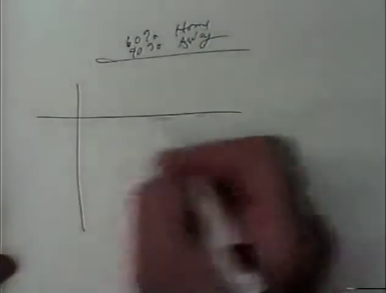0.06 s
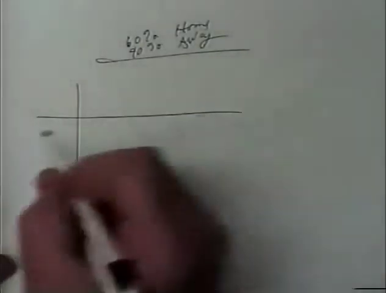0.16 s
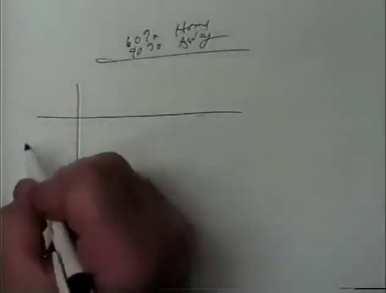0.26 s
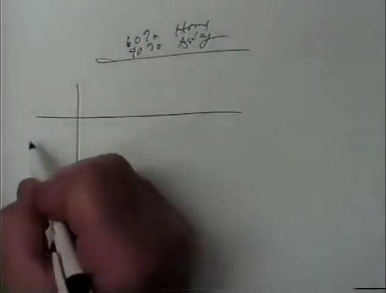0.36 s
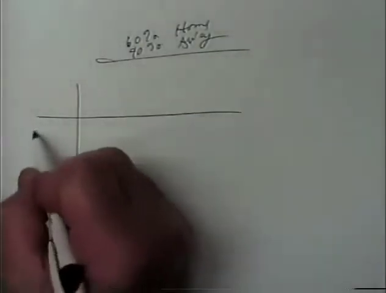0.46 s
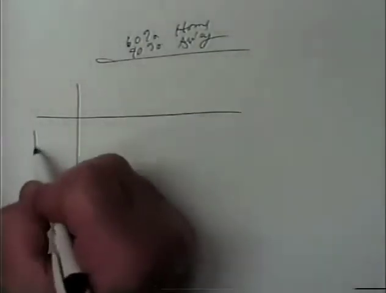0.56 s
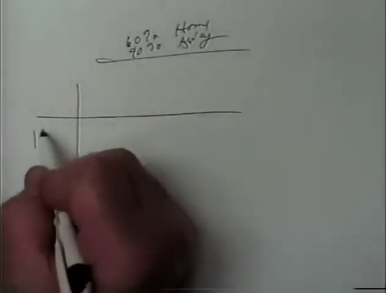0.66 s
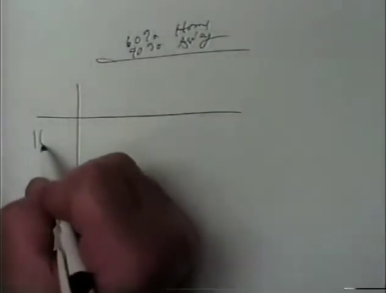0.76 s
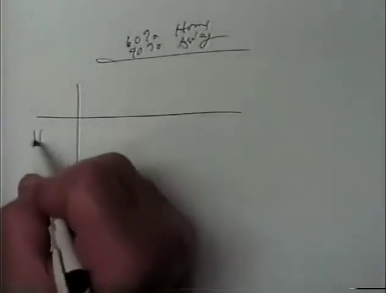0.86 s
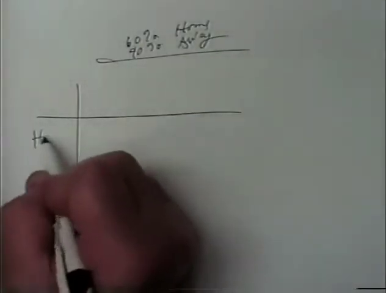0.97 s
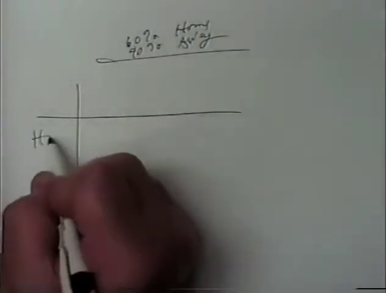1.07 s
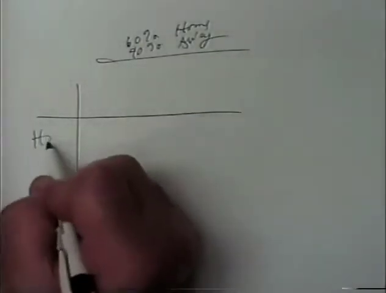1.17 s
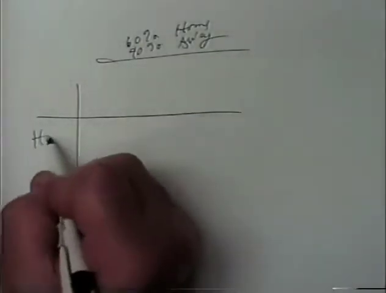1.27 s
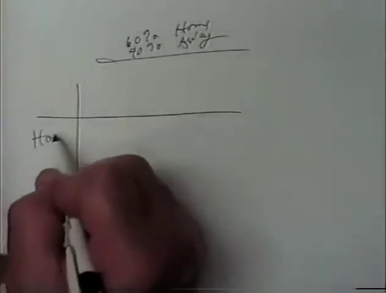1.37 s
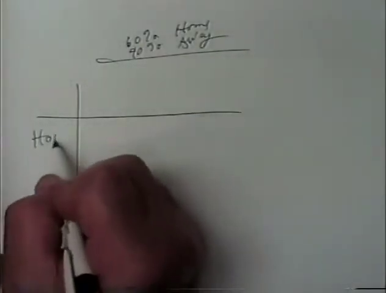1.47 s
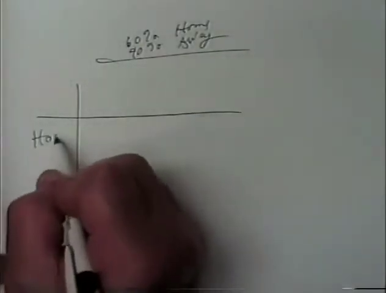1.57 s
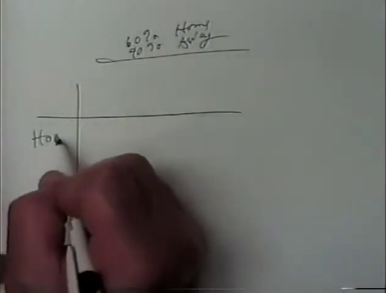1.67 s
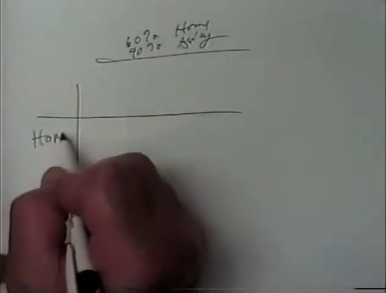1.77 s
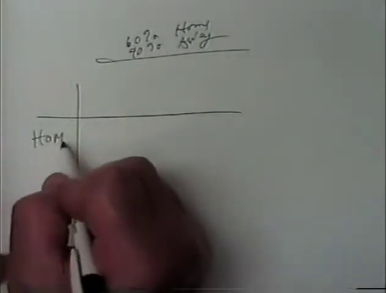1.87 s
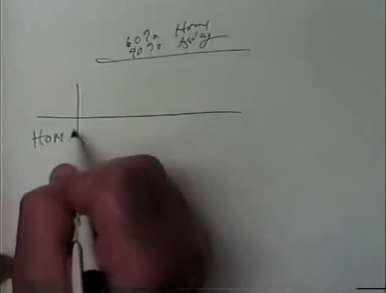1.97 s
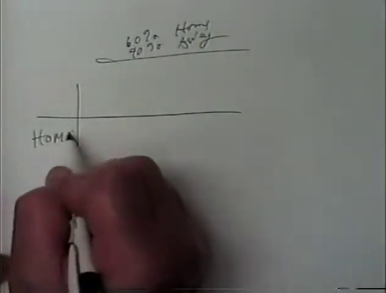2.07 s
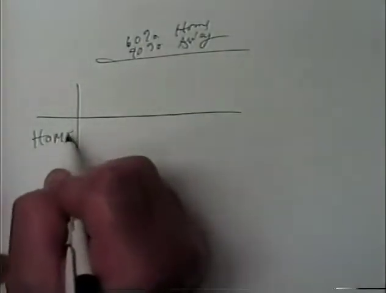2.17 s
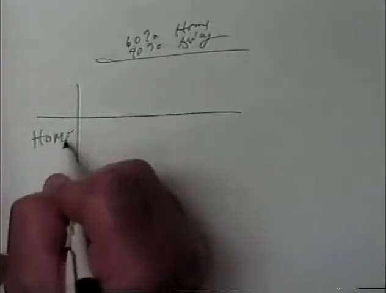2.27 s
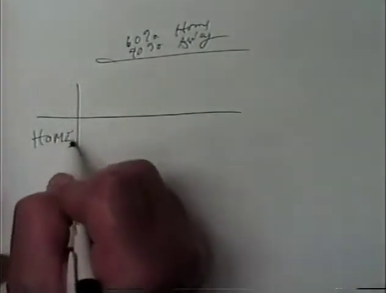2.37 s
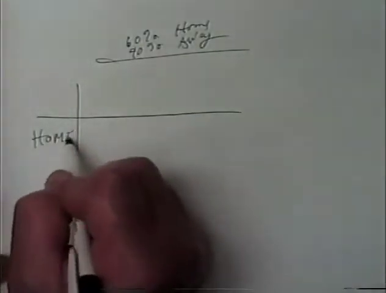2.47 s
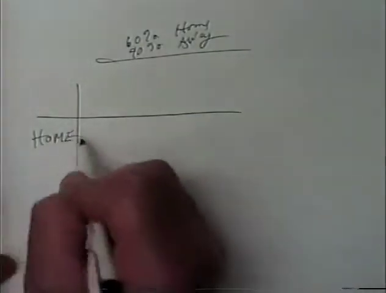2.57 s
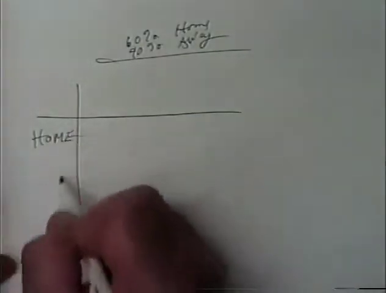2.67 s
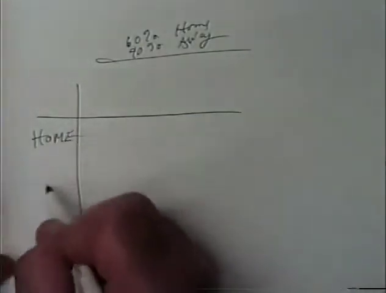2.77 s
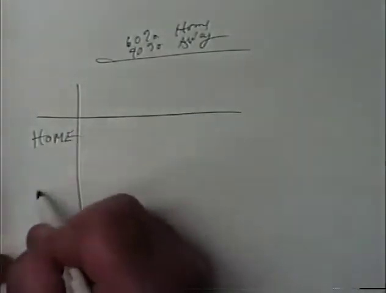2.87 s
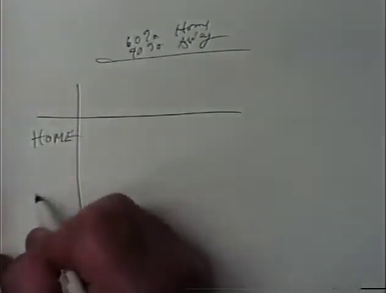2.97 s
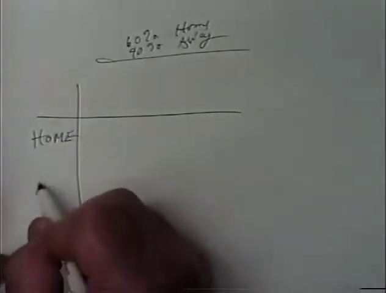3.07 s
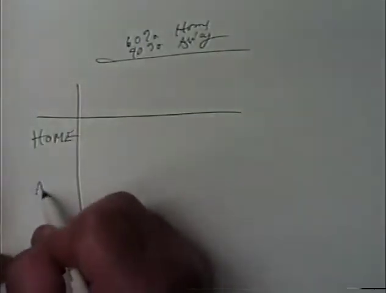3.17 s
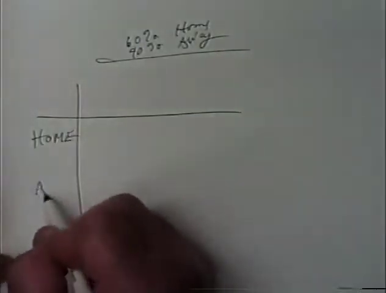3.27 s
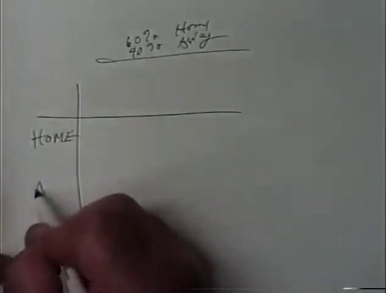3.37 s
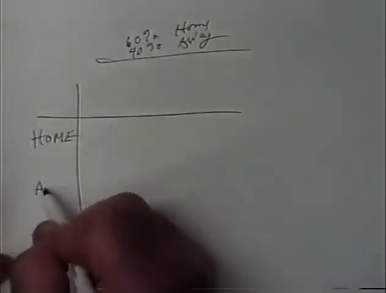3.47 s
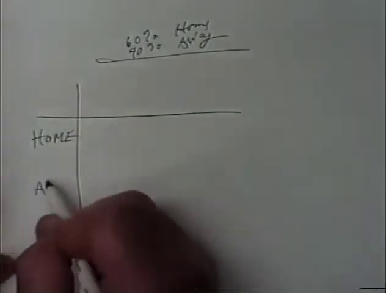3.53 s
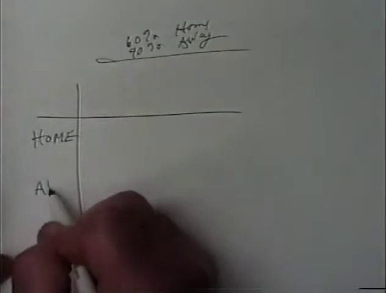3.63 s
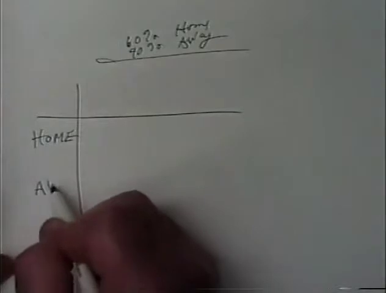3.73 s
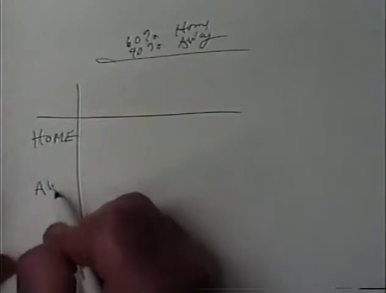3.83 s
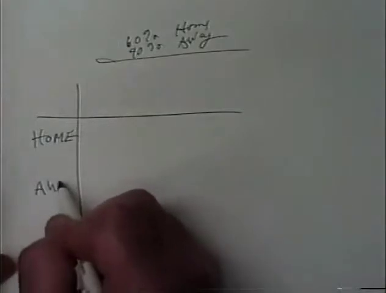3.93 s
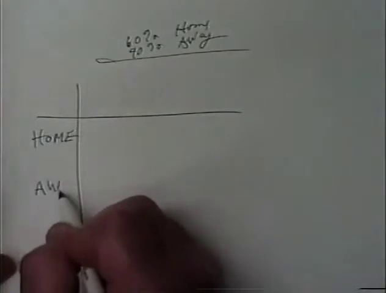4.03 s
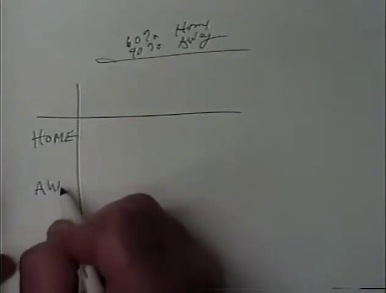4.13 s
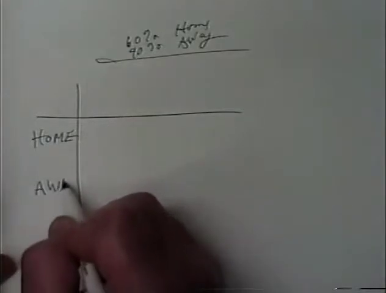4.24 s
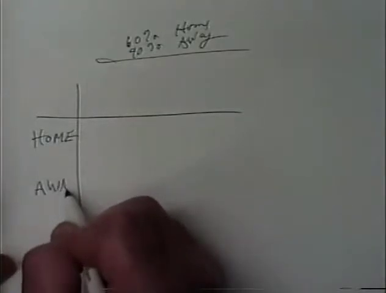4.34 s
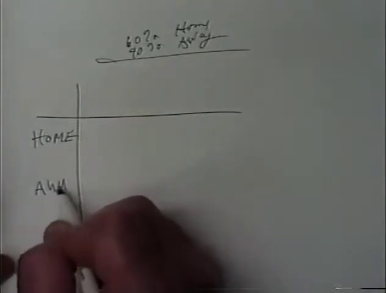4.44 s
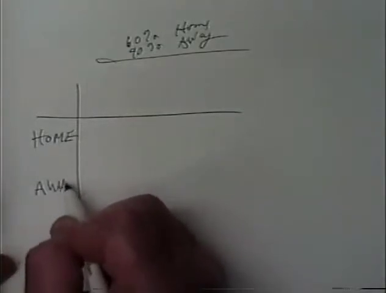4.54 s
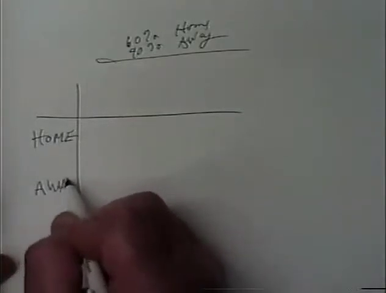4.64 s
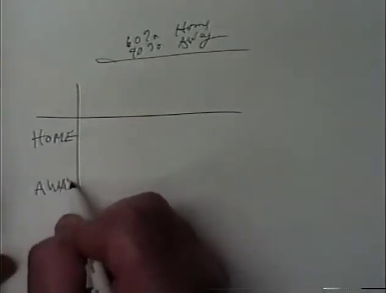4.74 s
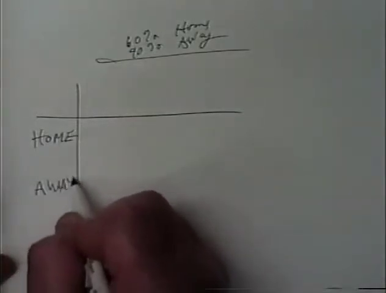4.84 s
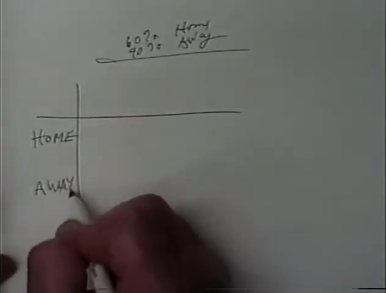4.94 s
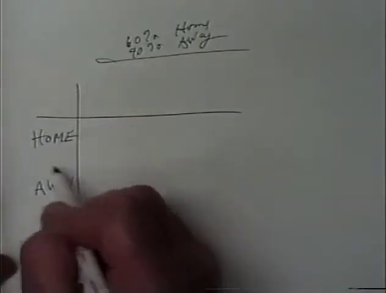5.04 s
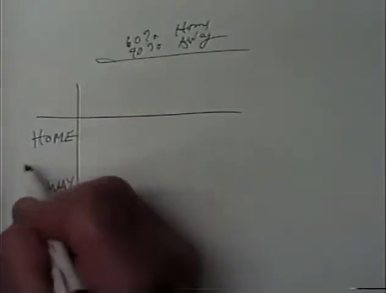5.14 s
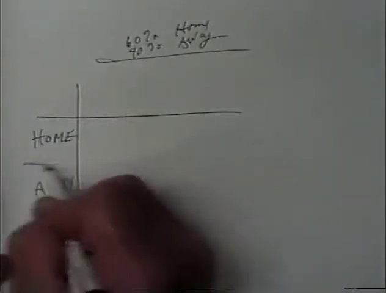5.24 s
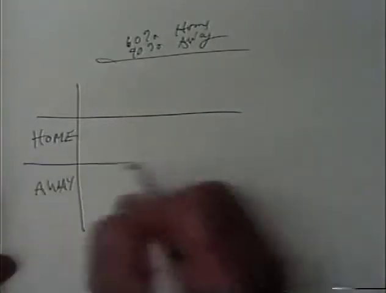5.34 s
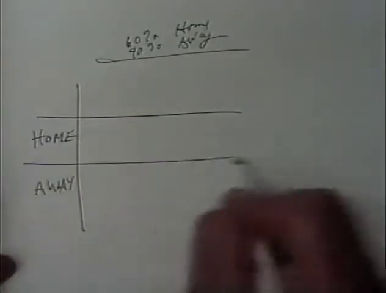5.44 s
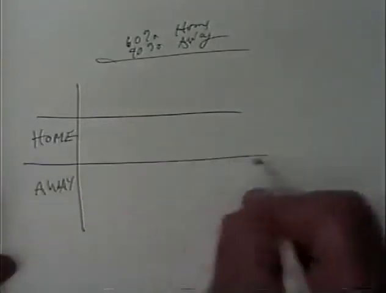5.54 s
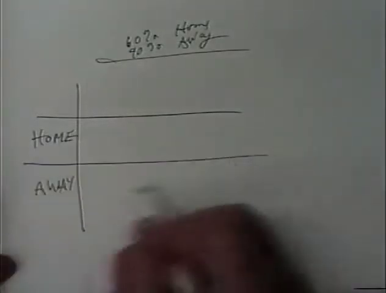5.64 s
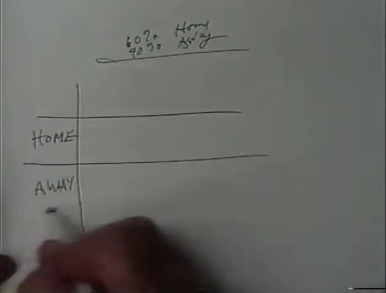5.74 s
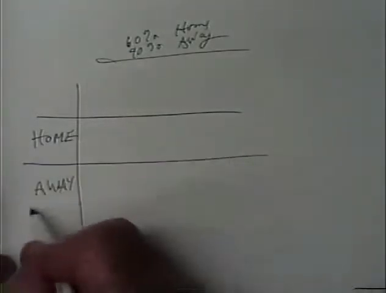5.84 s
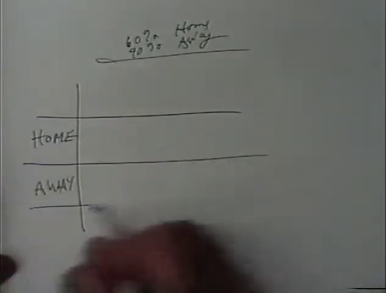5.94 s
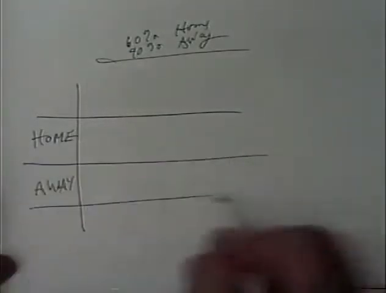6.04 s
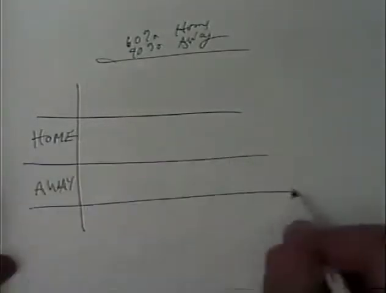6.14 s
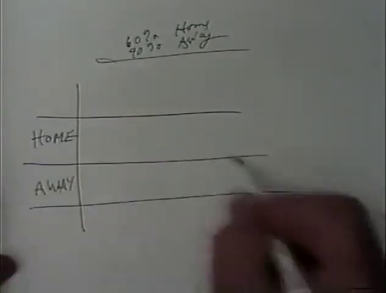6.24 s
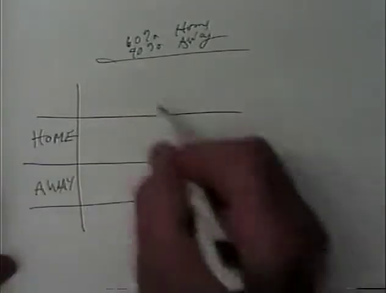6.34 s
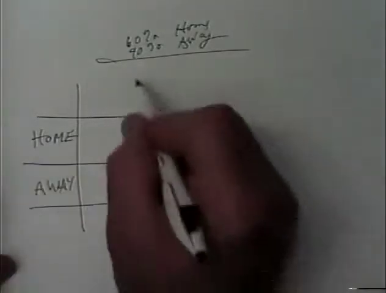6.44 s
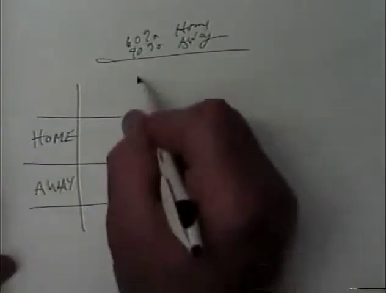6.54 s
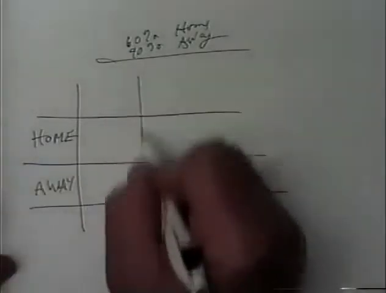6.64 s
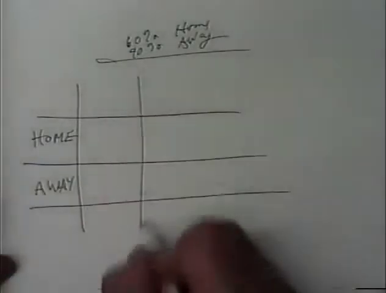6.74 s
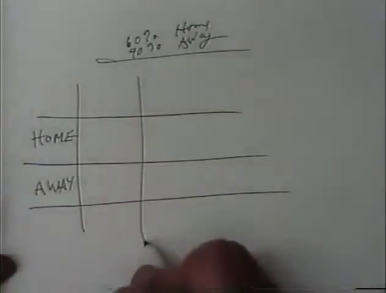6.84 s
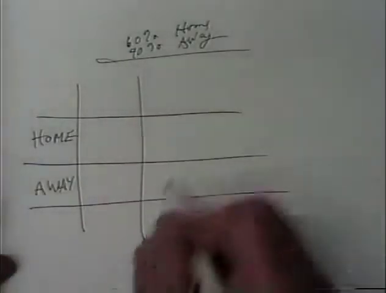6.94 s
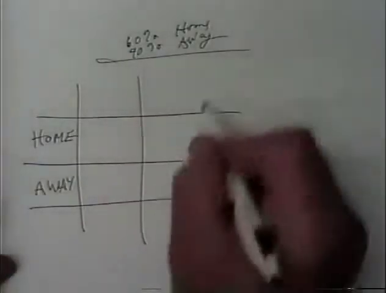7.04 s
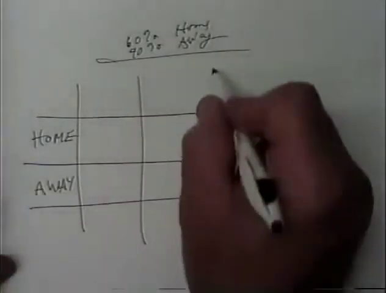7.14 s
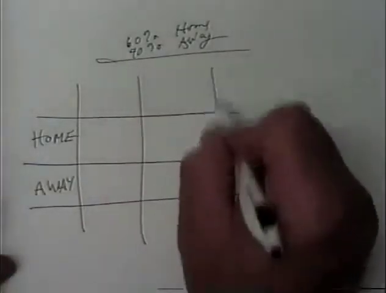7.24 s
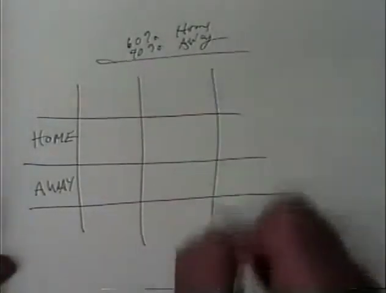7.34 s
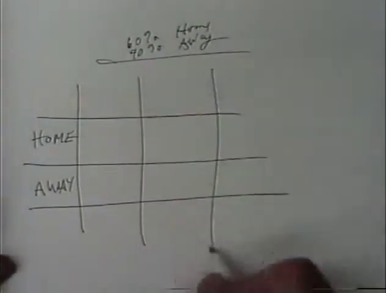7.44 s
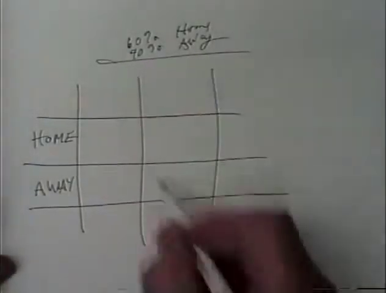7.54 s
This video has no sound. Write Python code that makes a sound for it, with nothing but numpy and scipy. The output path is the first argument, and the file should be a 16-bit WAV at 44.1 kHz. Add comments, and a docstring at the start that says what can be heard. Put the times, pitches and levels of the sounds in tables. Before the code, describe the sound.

A felt marker works on a hard board, heard closely in a small, briefly ringing room. At 0 seconds a fast stroke is already under way, squeaking for an instant and scraping to a stop by 0.2. After a pause, a knock at 0.6 begins the first word: short, dry rubs, judders and light taps until about 2.7. A fainter landing near 3.1 starts the second word, with stronger scratchy strokes around 4.0 to 4.4 and a last rub at 5.0. A tap at 5.3 leads into a loud scraping, fizzing swipe until 5.7; another runs from 6.0 to 6.3. Two somewhat softer, lower swipes follow at 6.7 to 7.0 and 7.3 to 7.6, the last starting with the hardest knock. Low rumble, mains hum, soft hiss and a very high, thin throbbing whistle stay constant.

```python
"""A felt marker on a white board, close by in a small room: a ruled line, already under way, squeaks at its
fastest and stops; two short words are printed, then two lines are ruled across and two down.
Each touch-down knocks the board; slow letter strokes judder and rub, as random slips shaped by resonances;
fast lines merge dense slips into scrape and fizz. The room rings briefly after each.
Throughout: low rumble and microphone hiss (shaped noise), mains hum and a thin throbbing whistle (sines)."""
import sys
import numpy as np
from scipy import signal
from scipy.fft import rfft, irfft
from scipy.io import wavfile
from scipy.ndimage import uniform_filter1d

SR = 44100
rng = np.random.default_rng(int(sys.argv[2]) if len(sys.argv) > 2 else 0)


def unload_wav(signal):
    """Save mono or channel-first audio to the path in sys.argv[1] as 16-bit WAV at rate SR, clipped to [-1, 1]."""
    wavfile.write(
        sys.argv[1],
        SR,
        np.round(np.clip(np.atleast_2d(signal).T, -1, 1) * 32767).astype(np.int16),
    )


N = 335248
TIME_S = np.arange(N) / SR

# ruled lines: start t/s, fastest t/s, stop t/s, level/dB, set-off rub re level/dB, fizz re level/dB
LINES_ACROSS = [(-0.2, 0.045, 0.2, -26, -20, -19), (5.335, 5.55, 5.72, -23.5, -13.5, -21.5),
                (5.97, 6.2, 6.33, -23.5, -20, -19)]
LINES_DOWN = [(6.67, 6.86, 7.035, -30.5, -19, -19.5), (7.315, 7.485, 7.625, -27, -17, -18)]
# tip squeaks: middle t/s, length t/s, pitch f/Hz, level/dB
SQUEAKS = [(.005, 0.13, 1220, -26), (0.046, 0.057, 2700, -28.5)]
# letter strokes: middle t/s, length t/s, level/dB, glide (0 sticking, 1 sliding freely)
STROKES = [(0.65, 0.09, -45, .35), (0.685, 0.024, -38.5, 0.77), (0.87, 0.047, -43, 0.35),
           (0.894, .026, -37.5, 0.82), (1.103, 0.032, -35.5, 0.6), (1.37, 0.061, -41.5, .27),
           (1.619, 0.055, -42.5, 0.42), (1.724, 0.043, -38.5, 0.38), (1.8, .04, -45, 0.24),
           (1.88, 0.043, -44, .27), (1.971, 0.036, -40.5, 0.58), (2.206, 0.055, -43.5, 0.26),
           (2.355, 0.05, -38, .22), (2.453, .04, -42.5, .33), (2.664, 0.032, -38, 0.51),
           (3.214, 0.046, -35.5, 0.41), (3.314, 0.057, -35, 0.39), (3.58, 0.046, -46.5, 0.36),
           (3.777, 0.057, -40.5, 0.44), (3.889, 0.029, -42.5, 0.33), (3.966, 0.033, -38.5, 0.35),
           (4.053, 0.046, -33, 0.32), (4.132, 0.021, -40, 0.4), (4.242, 0.017, -41.5, 0.22),
           (4.325, 0.066, -34, 0.3), (4.417, 0.029, -34.5, 0.3), (4.555, 0.026, -44, 0.31),
           (4.638, 0.041, -49, 0.56), (4.81, 0.04, -44, 0.34), (5.033, 0.065, -37, 0.47)]
# spans of faint tip motion while printing: start t/s, end t/s
FIDGET_SPANS = [(0.6, 2.78), (3.15, 4.1)]
# tip landings: t/s, strength/dB, hardness/dB (extra tick and crush)
LANDINGS = [(0.594, -29, 0.5), (0.83, -30, -0.5), (1.032, -35, 0.5), (1.571, -35.5, -0.5), (2.123, -31, -1),
            (2.603, -29.5, 2), (2.799, -56, 9), (3.078, -41.5, 4.5), (3.512, -32, 1), (3.728, -30.5, 1),
            (4.769, -32, -1), (4.959, -34, -2), (5.304, -31.5, 1.5), (5.955, -26, 3.5), (6.667, -26, 0.5),
            (7.311, -20.5, 1.5)]
# resonances of the board and what it lies on: f/Hz, width/Hz, lift/dB
BOARD_MODES = [(144, 43.4, 12.5), (196, 50, 3.5), (344.3, 41, 12), (477.7, 95, 12), (640, 54, 1.5),
               (847, 70, 6), (965, 120, 2.5), (1085, 196, 4.5), (1208, 32, 6.5), (1348.5, 15, 9),
               (1486, 84, 2.5), (1590, 55, 2), (2130, 79, 2.5), (2750, 53, 6.5)]
# force spectra at the tip, relative: f/Hz, level/dB
SCRAPE_ACROSS_FORCE = [(40, -8.5), (140, -4.5), (200, 2.5), (280, -9), (370, 2), (460, -4.5), (620, -0.5),
                       (900, 3.5), (1250, 3), (2100, 5), (2500, -4), (3900, -14), (5200, -30), (10000, -48)]
SCRAPE_DOWN_FORCE = [(40, -16), (140, -5.5), (200, -5), (290, -16), (380, 0), (460, -14), (620, -5.5),
                     (900, 0.5), (1250, 4), (1650, 1), (2000, -8), (2800, -11), (3900, -30), (5200, -55),
                     (10000, -44)]
FIZZ_FORCE = [(1500, -4), (3500, 9), (5200, 0.5), (6800, 3.5), (7700, -0.5), (8700, 4.5), (10500, -3),
              (13000, -7), (16000, -13)]
JUDDER_FORCE = [(50, -27), (110, -18.5), (150, 2), (220, -3), (300, -10.5), (420, -17.5), (800, -61.5)]
RUB_FORCE = [(150, -33.5), (280, -0.5), (355, 2.5), (470, 5.5), (610, 3), (750, -12.5), (1100, -18),
             (2500, -52.5)]
SCRATCH_FORCE = [(400, -22.5), (780, 3), (1050, 8), (1450, -1.5), (1900, 1), (2400, -8.5), (3500, -7.5),
                 (4500, -23), (9000, -19), (15000, -16)]
THUD_FORCE = [(30, -32), (90, -4), (140, 4), (200, 5), (290, -14), (470, -14.5), (700, -16.5), (1500, -61)]
TICK_FORCE = [(200, -30), (600, -29), (1050, 20.5), (1400, -16.5), (1900, 6), (3600, -37), (5000, -20),
              (15000, -41)]
CRUSH_FORCE = [(300, -25.5), (700, 3.5), (1400, 8), (2100, -5), (3600, -8.5), (5000, -20), (9000, -22),
               (15000, -22)]
# room decay: f/Hz, t60/s
ROOM_T60 = [(130, 0.48), (400, 0.35), (1200, 0.48), (3000, 0.44), (9000, 0.16)]
# rumble and hiss spectrum, relative: f/Hz, level/dB
AIR_SPECTRUM = [(20, -75.5), (45, -84), (90, -79), (160, -81), (250, -92), (400, -90), (700, -93.5),
                (1300, -97), (2200, -101), (5000, -104), (10000, -105), (15500, -106)]
# hum and whistle sines, close pairs beat: f/Hz, rms level/dB
HUM_TONES = [(60, -53), (59, -61), (120, -53), (240, -70), (300, -69), (360, -66), (480, -73), (720, -73),
             (1080, -76), (1320, -76), (15734, -64), (15743.7, -69)]

SCRAPE_POWER, FIZZ_POWER = 2.75, 2.42  # gain exponents of tip speed
POINTED = 0.41  # speed over a line: 0 round arch, 1 pointed
SET_OFF_S, BRAKE_S = 0.062, 0.087  # slow parts: after the start, before the stop
SLOW_LENGTH_S = 0.072
CHATTER_HZ, CHATTER_DB, CHATTER_POWER = 459, 5, 2.3  # power: exponent of glide
FIDGET_JUDDER_DB, FIDGET_RUB_DB, FIDGET_SPREAD_DB = -59.5, -68, 3.5
FIDGET_S = 0.024  # averaging time of the unevenness
CRUSH_S = 0.010  # decay to 1/e
AIR_RMS_DB = -54
EDGE_HZ = 15900


def ruled(lines, scrape_force, scrape_db, judder_db, brake_db, uneven_db):
    """Long strokes: judder on setting off, rub there and on braking; dense slips between merge to scrape and fizz."""
    scrape = friction(scrape_force, slips(per_s=3000, spread_db=4), 700, 2400)
    fizz = friction(FIZZ_FORCE, slips(per_s=10000, spread_db=3), 5000, 13000)
    wander = unit(uniform_filter1d(rng.standard_normal(N), SR // 60))
    grip = amp(uneven_db * wander)
    fast, setting_off, braking = np.zeros((3, N))
    for start_s, fastest_s, stop_s, db, set_off_db, fizz_db in lines:
        speed = line_speed(start_s, fastest_s, stop_s)
        fast += amp(db + scrape_db) * speed ** SCRAPE_POWER * scrape
        fast += amp(db + fizz_db) * speed ** FIZZ_POWER * fizz
        setting_off += amp(db + set_off_db) * swell(TIME_S - start_s - SET_OFF_S, SLOW_LENGTH_S)
        braking += amp(db + brake_db) * swell(TIME_S - stop_s + BRAKE_S, SLOW_LENGTH_S)
    return fast * grip + slow_friction(amp(judder_db) * setting_off, setting_off + braking)


def line_speed(start_s, fastest_s, stop_s):
    """One sweep of the arm: speed 0-1 rises and falls, between a round arch and a pointed one."""
    ramp = np.interp(TIME_S, [start_s, fastest_s, stop_s], [0, 1, 0])
    arch = np.sin(np.pi / 2 * ramp)
    return POINTED * ramp + (1 - POINTED) * arch


def letters():
    """Short strokes: a sticking tip judders, a gliding one rubs, the freest glides lock into a low chatter."""
    judder, rub, chatter = np.zeros((3, N))
    for middle_s, length_s, db, glide in STROKES:
        press = amp(db) * swell(TIME_S - middle_s, length_s)
        judder += press * (1 - glide)
        rub += press * glide
        chatter += press * glide ** CHATTER_POWER
    fidget = fidgeting()
    judder = np.hypot(judder, amp(FIDGET_JUDDER_DB) * fidget)
    rub = np.hypot(rub, amp(FIDGET_RUB_DB) * fidget)
    chatter_tone = np.sin(CHATTER_HZ * wavering_phase())
    return slow_friction(judder, rub) + amp(CHATTER_DB) * chatter * chatter_tone


def fidgeting():
    """While printing the tip keeps moving faintly between strokes: an uneven strength that fades after each span."""
    moving = np.zeros(N)
    for start_s, stop_s in FIDGET_SPANS:
        moving += np.interp(TIME_S, [start_s, start_s + 0.016, stop_s, stop_s + 0.17], [0, 1, 1, 0])
    wander = unit(uniform_filter1d(rng.standard_normal(N), int(FIDGET_S * SR)))
    return moving * amp(FIDGET_SPREAD_DB * wander)


def squeaks():
    """Brief swelling tones of the tip at speed, sharing one wavering phase."""
    phase = wavering_phase()
    out = np.zeros(N)
    for middle_s, length_s, hz, db in SQUEAKS:
        out += amp(db) * swell(TIME_S - middle_s, length_s) * np.sin(hz * phase)
    return out


def taps(thud_db=2, tick_db=-10, crush_db=-12):
    """The tip lands with a tick, its felt crushes, and a moment later the hand's weight thuds on the board."""
    thud, tick = (h / abs(h).max() for h in (board(THUD_FORCE), board(TICK_FORCE)))
    crush_decay = np.exp(-TIME_S[:SR // 15] / CRUSH_S)
    knocks, squash = np.zeros((2, N))
    for landed_s, db, hard_db in LANDINGS:
        pressed_s = landed_s + rng.uniform(0.0014, 0.0022)
        hard_tick = amp(db + hard_db + tick_db) * tick
        add(knocks, landed_s, -hard_tick)
        add(knocks, pressed_s, hard_tick + amp(db + thud_db) * thud)
        add(squash, landed_s, amp(db + hard_db + crush_db) * crush_decay)
    fibres = friction(CRUSH_FORCE, slips(per_s=4000, spread_db=2), 800, 4000)
    return knocks + squash * fibres


def slow_friction(judder, rub, scratch_db=-11, judder_scratch=0.14):
    """The same slips judder the lowest resonance, rub the middle ones and scratch above, mostly with the rub."""
    pulses = slips(per_s=1200, spread_db=4)
    layers = np.array([friction(JUDDER_FORCE, pulses, 130, 270),
                       friction(RUB_FORCE, pulses, 290, 700),
                       friction(SCRATCH_FORCE, pulses, 800, 3000)])
    # the hand's steady pressure keeps the strength even within a stroke
    layers /= np.sqrt(uniform_filter1d(layers ** 2, SR // 40) + 0.05)
    scratch = amp(scratch_db) * (rub + judder_scratch * judder)
    return judder * layers[0] + rub * layers[1] + scratch * layers[2]


def slips(per_s, spread_db):
    """Fibres catch and let go at random: small pulses of either sign and uneven size."""
    pulses = (rng.random(N) < per_s / SR) * rng.choice([-1., 1.], N)
    return pulses * amp(spread_db * np.clip(rng.standard_normal(N), -2, 2))


def friction(force, pulses, lo_hz, hi_hz):
    """Slips sound through the board, scaled to strength 1 within the band."""
    sound = signal.oaconvolve(pulses, board(force))[:N]
    band = signal.butter(3, [lo_hz, hi_hz], "band", fs=SR, output="sos")
    return sound / np.std(signal.sosfilt(band, sound))


def wavering_phase(waver=0.0388, waver_s=0.0039):
    """Phase per Hz of slips that lock into an unsteady pitch; waver is the rms fraction."""
    drift = unit(uniform_filter1d(rng.standard_normal(N), int(waver_s * SR)))
    return 2 * np.pi * np.cumsum(1 + waver * drift) / SR


def swell(t_s, length_s):
    """The tip speeds up and slows down: a bell of the given length at half height."""
    return 0.5 ** np.minimum((2 * t_s / length_s) ** 2, 64)


def board(force, size=8192):
    """Causal (minimum-phase) response of the resonant board to one pulse of the given force spectrum."""
    hz = abs(np.fft.fftfreq(size, 1 / SR))
    db = read(force, hz)
    for mode_hz, width_hz, lift_db in BOARD_MODES:
        db = db + lift_db / (1 + (2 * (hz - mode_hz) / width_hz) ** 2)
    # log magnitude and its Hilbert transform give the phase
    spectrum = np.exp(np.conj(signal.hilbert(np.log(amp(db)))))
    return np.fft.ifft(spectrum).real[:size // 2]


def room(x, wet_db, count=3):
    """A small hard room: dense reflections, each band dying at its own speed, cross-fading between echo sets."""
    out, size = x.copy(), SR * 3 // 4
    for k in range(count):
        # silent for 1 ms, full by 2 ms
        echoes = rng.standard_normal(size) * np.clip(TIME_S[:size] / 0.001 - 1, 0, 1)
        hz, t_s, bins = signal.stft(echoes, SR, nperseg=256)
        colour_db = read([(170, -7), (400, -3), (3000, -5), (9000, -6.5)], hz)[:, None]
        decay_db = 60 * t_s / read(ROOM_T60, hz)[:, None]
        tail = signal.istft(bins * amp(colour_db - decay_db), SR, nperseg=256)[1]
        # each set peaks in turn, 0.2 s apart
        share = np.sqrt(np.maximum(1 - abs((TIME_S / 0.2 + k) % count - 1), 0))
        out += amp(wet_db) * signal.fftconvolve(x * share, tail / np.linalg.norm(tail))[:N]
    return out


def background():
    """Room rumble and microphone hiss as shaped noise; mains hum and a throbbing electronic whistle as sines."""
    gain = amp(read(AIR_SPECTRUM, np.fft.rfftfreq(N, 1 / SR)))
    air = irfft(rfft(rng.standard_normal(N)) * gain, N)
    tones = np.zeros(N)
    for hz, rms_db in HUM_TONES:
        tones += np.sqrt(2) * amp(rms_db) * np.sin(2 * np.pi * (hz * TIME_S + rng.random()))
    return amp(AIR_RMS_DB) * unit(air) + tones


def amp(db):
    """Decibels to gain."""
    return 10 ** (np.asarray(db) / 20)


def unit(x):
    """Scales to rms 1."""
    return x / np.sqrt(np.mean(x ** 2) + 1e-20)


def read(points, hz):
    """Joins (f/Hz, value) points on a log-frequency axis."""
    f_hz, value = np.transpose(points)
    return np.interp(np.log(hz + 1), np.log(f_hz + 1), value)


def add(mix, start_s, sound):
    """Mixes a sound in place at start_s."""
    part = mix[max(round(start_s * SR), 0):][:len(sound)]
    part += sound[:len(part)]


def scene():
    """Pen, board and room are central; the background sits a little to the left."""
    lines = ruled(LINES_ACROSS, SCRAPE_ACROSS_FORCE, scrape_db=-1.5, judder_db=-7, brake_db=-17, uneven_db=0.84)
    lines += ruled(LINES_DOWN, SCRAPE_DOWN_FORCE, scrape_db=1.5, judder_db=6.5, brake_db=-8, uneven_db=1)
    rubbing = room(lines + letters() + squeaks(), wet_db=-9.5)
    knocks = room(taps(), wet_db=-10)
    left_right_gain = amp([[0.3], [-0.3]])
    return rubbing + knocks + background() * left_right_gain


def record(dry):
    """The recorder's band limit: a steep linear-phase low-pass."""
    low_pass = signal.firwin(1023, EDGE_HZ, window=("kaiser", 9), fs=SR)
    return signal.oaconvolve(dry, low_pass[None], "same")


dry = scene()
out = record(dry)
unload_wav(out)
```